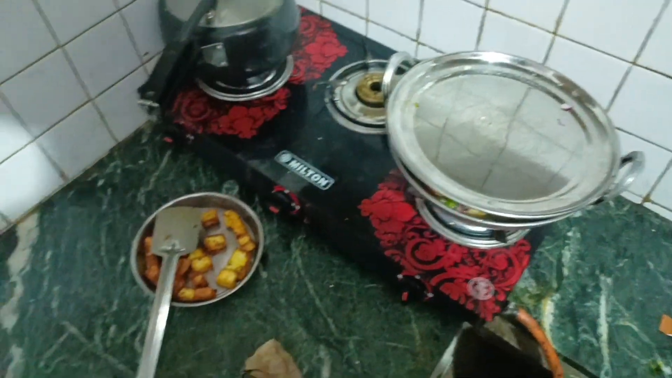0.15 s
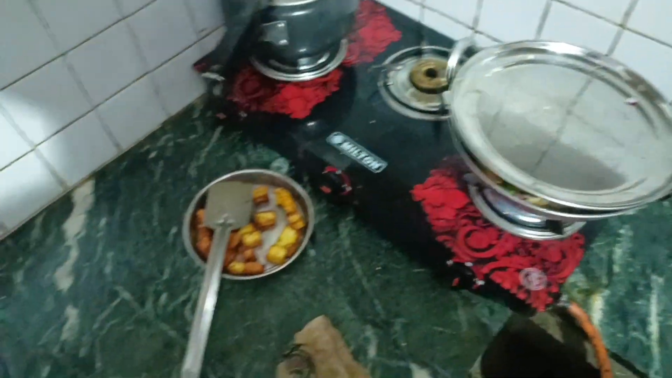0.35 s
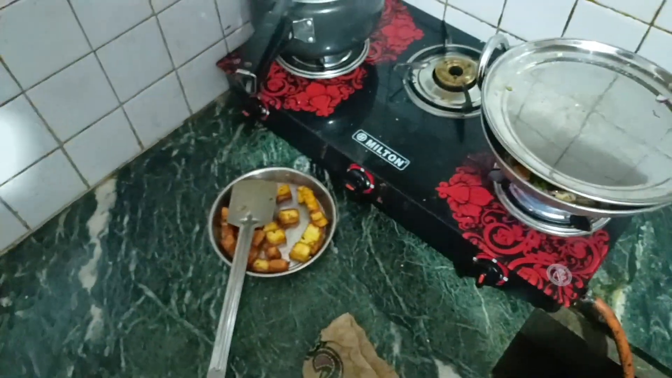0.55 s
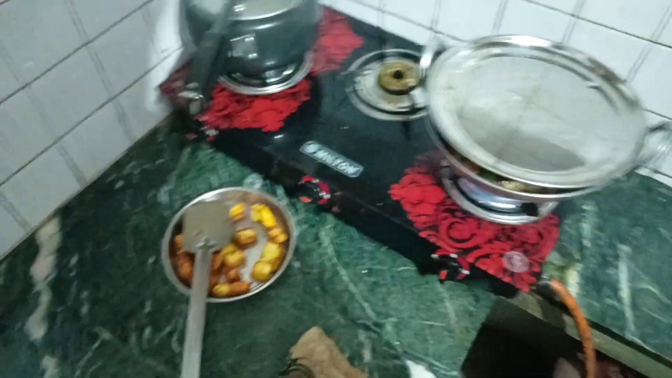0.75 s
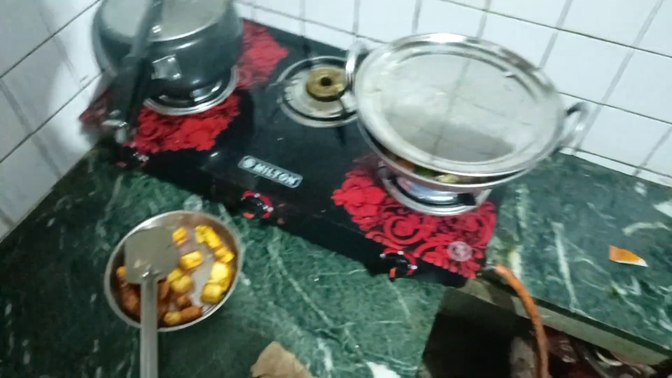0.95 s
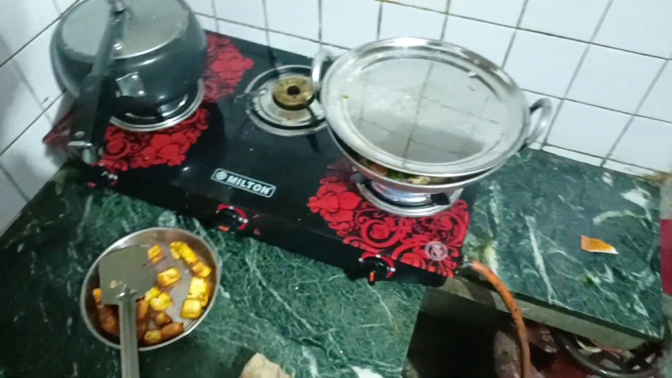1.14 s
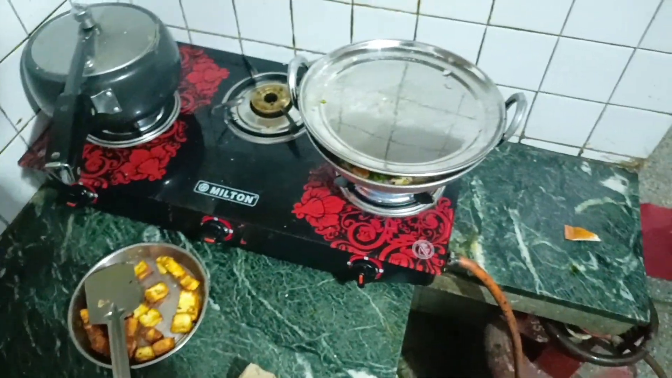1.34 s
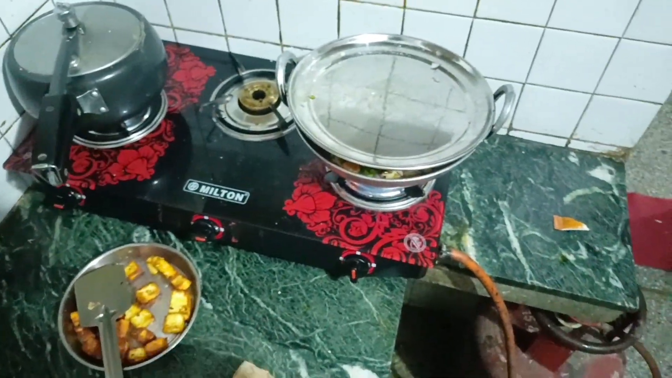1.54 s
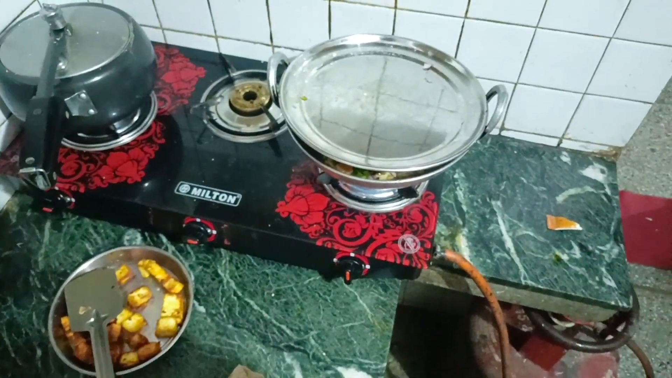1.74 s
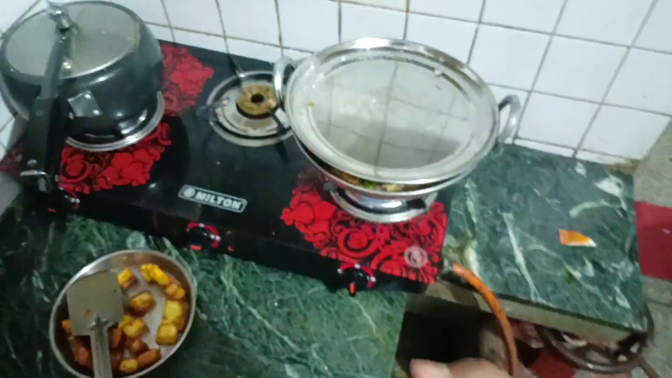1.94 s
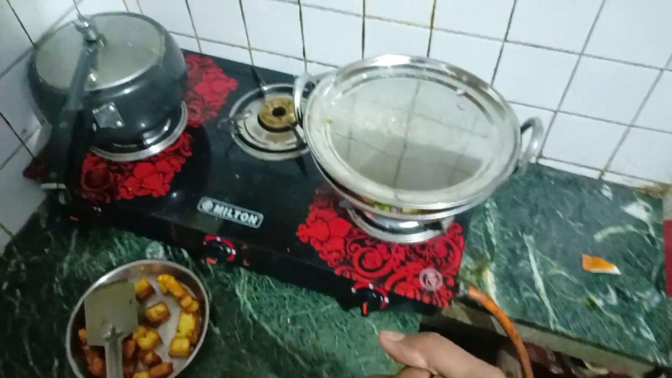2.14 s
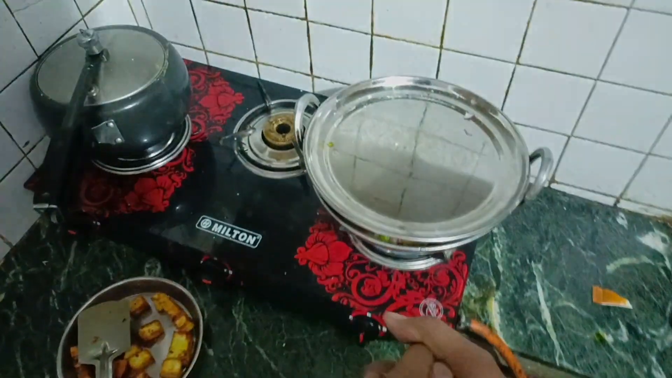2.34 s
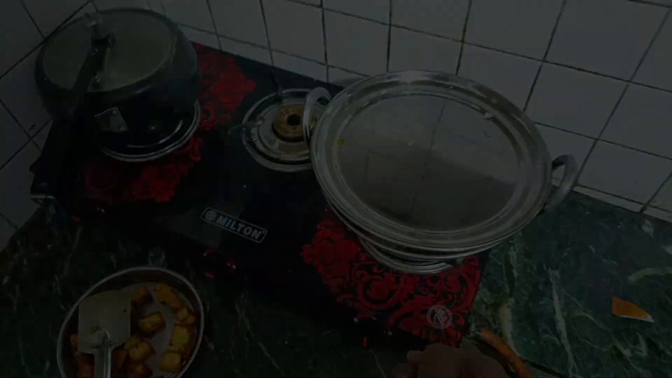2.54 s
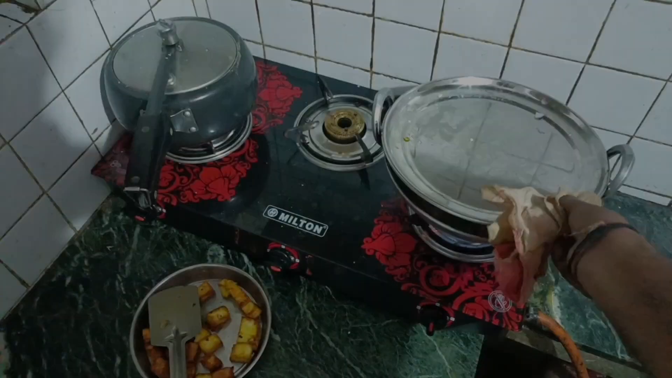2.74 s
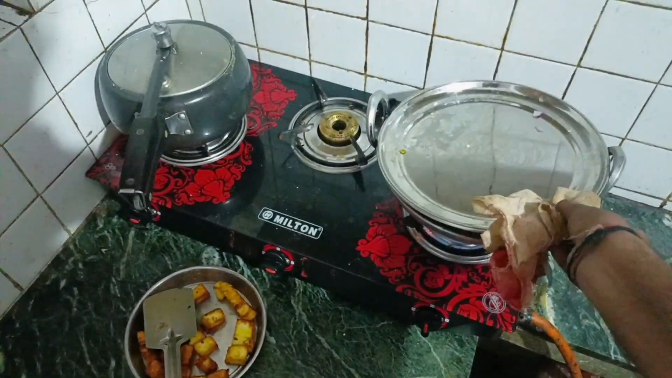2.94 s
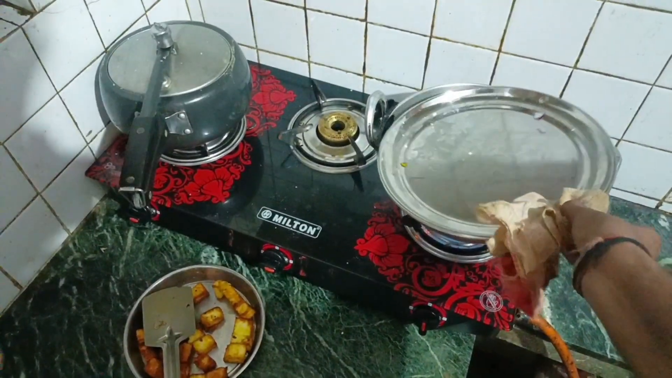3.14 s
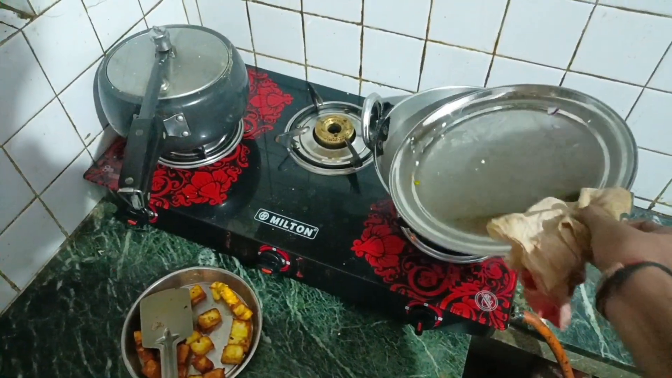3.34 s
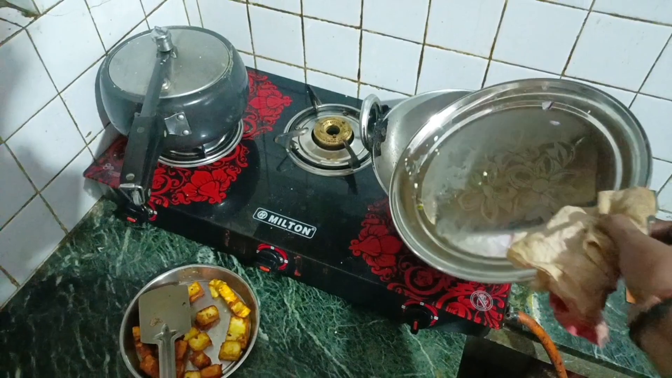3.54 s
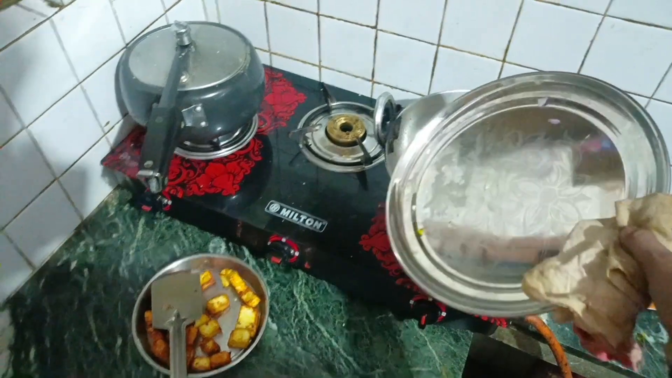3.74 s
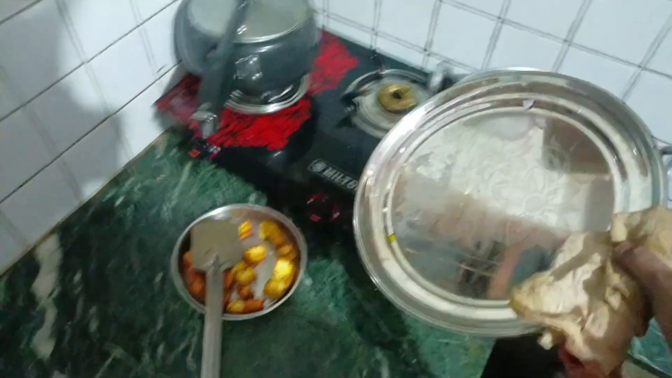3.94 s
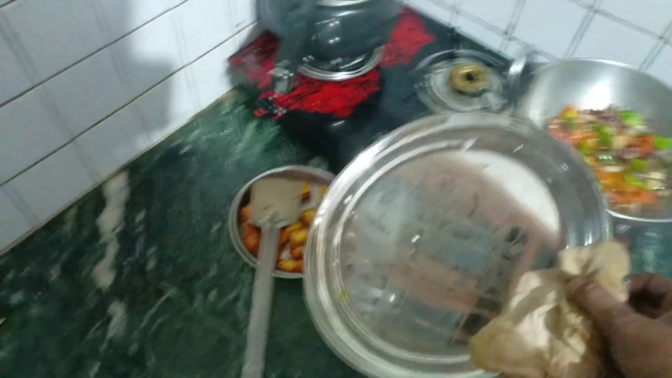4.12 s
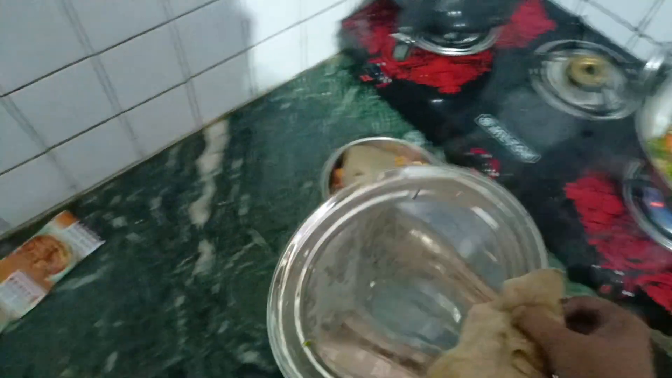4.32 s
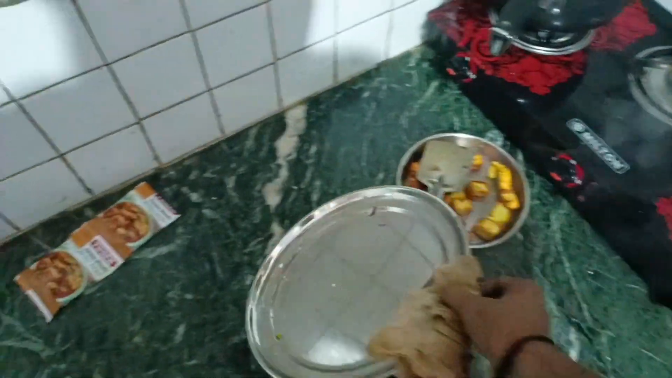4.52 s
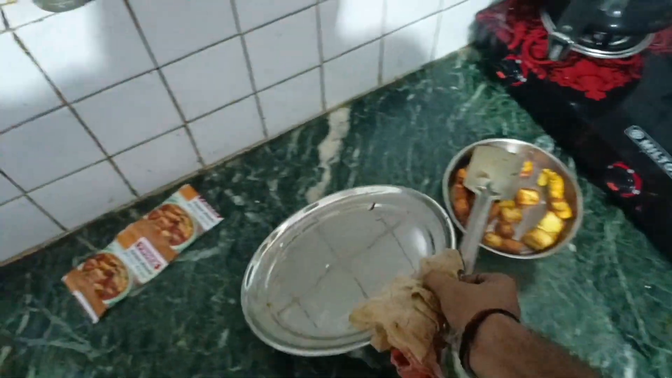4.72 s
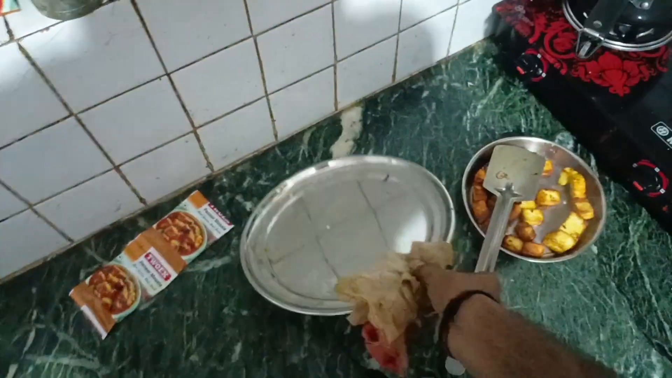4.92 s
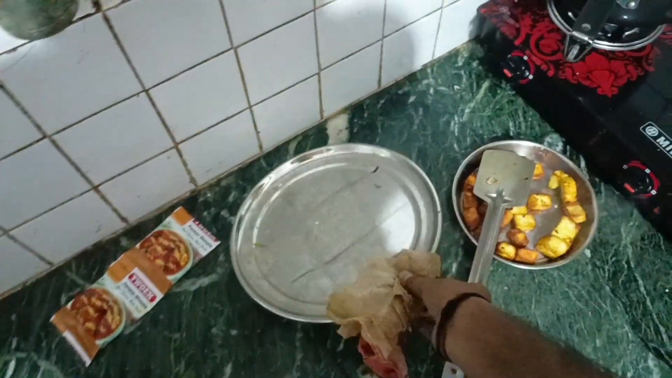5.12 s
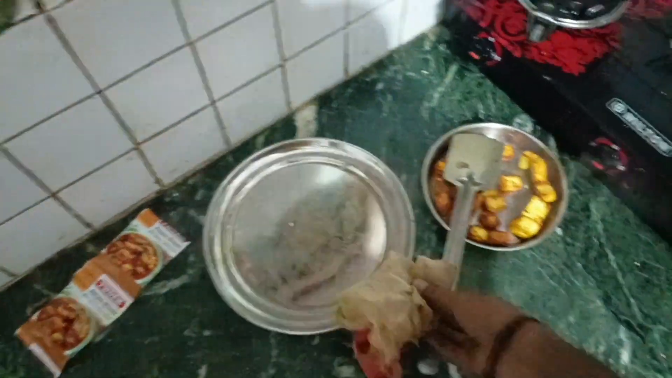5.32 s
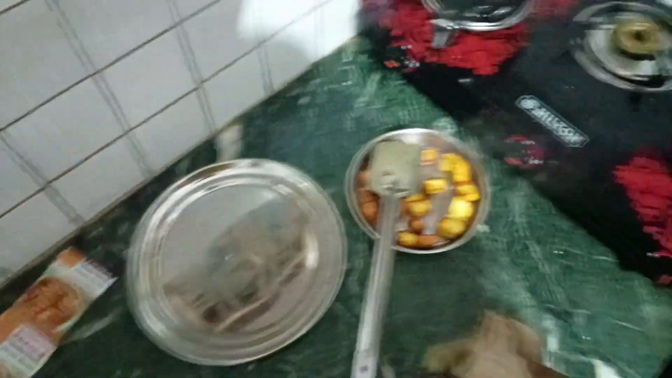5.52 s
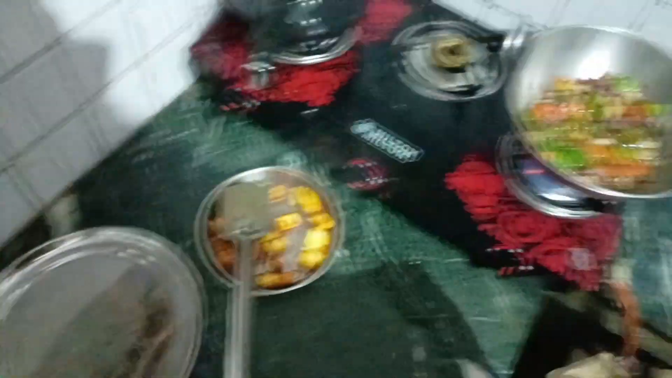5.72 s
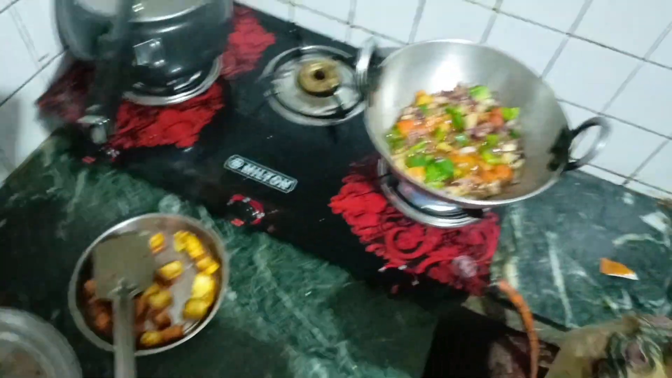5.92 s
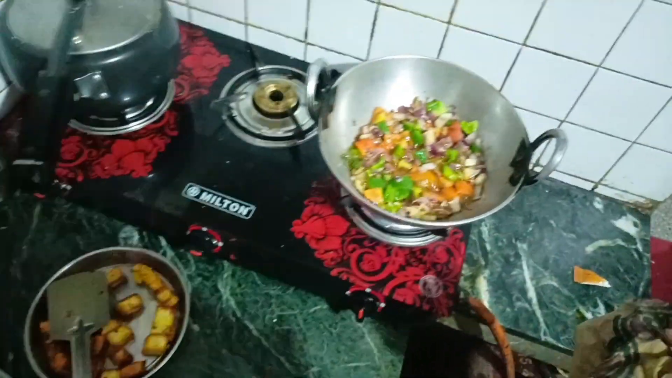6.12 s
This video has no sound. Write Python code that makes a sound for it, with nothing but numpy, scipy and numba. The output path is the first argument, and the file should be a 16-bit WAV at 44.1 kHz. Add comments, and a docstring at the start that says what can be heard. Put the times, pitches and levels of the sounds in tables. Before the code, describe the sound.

Vegetables sizzle steadily in a covered pan, then a steel lid clanks, scrapes off and clatters down on a stone counter.

```python
"""Vegetables fry in a steel pan on a gas stove in a tiled kitchen. At first the pan is covered, and
resonances of the trapped air colour the noise of bursting bubbles. All fades through silence at 2.6 s.
As the sound returns, a hand knocks the lid and drags it off the rim, exciting its damped modes, and the
sizzle opens out. Air buffets the swinging microphone near 4.1 s. The lid's edge meets the stone counter
at 4.7 s, and at 5.3 s the lid drops flat while the frying goes on."""
import sys
import numpy as np
from scipy import signal
from scipy.fft import rfft, irfft, next_fast_len
from scipy.io import wavfile
from scipy.ndimage import uniform_filter1d
from numba import njit

SR = 44100
rng = np.random.default_rng(int(sys.argv[2]) if len(sys.argv) > 2 else 0)


def transcribe(u):
    """Save the signal u as a 16-bit wav file named by the first command-line argument.

    u: samples, shape (n,) or (channels, n), limited to [-1, 1]; the rate is SR.
    q: integer samples, one column per channel.
    """
    v = np.clip(np.atleast_2d(u).T, -1, 1)
    q = np.round(v * 32767).astype(np.int16)
    wavfile.write(sys.argv[1], SR, q)


N = 276330
TIME = np.arange(N) / SR
FFT_SIZE = next_fast_len(N + SR // 2)
HZ = np.maximum(np.fft.rfftfreq(FFT_SIZE, 1 / SR), 1)

# Tiled room. Each row: frequency in Hz, reverberation time in seconds.
REVERB_TIMES = [(100, 0.78), (500, 0.72), (2000, 0.54), (5000, 0.37), (12000, 0.046)]
# Likeness of left and right. Each row: frequency in Hz, correlation.
COHERENCE = [(60, 0.78), (130, 0.75), (290, 0.83), (640, 0.62), (1410, 0.17), (3100, 0.13), (6820, -0.02),
             (15000, 0.0)]

# Noise spectra. Each row: frequency in Hz, relative spectral density in dB.
HUM_SPECTRUM = [(15, -50), (25, -26), (49, -15.5), (92, 1.5), (108, 4), (146, -11), (172, -8.5), (183, -22),
                (220, -5), (290, -21), (480, -120)]
FIZZ_SPECTRUM = [(1800, -28), (3000, -1.5), (4000, -6.5), (4600, -2.5), (6500, -6.5), (7800, -5),
                 (11300, -15.5), (13400, -13), (15000, -17), (15800, -7.5)]
OPEN_PAN_SPECTRUM = [(100, -43), (170, -19.5), (328, 0), (380, -9), (455, 0.5), (528, -6), (670, -9.5),
                     (733, 0.5), (988, -8.5), (2110, -4), (3510, -3), (4200, -11), (6000, -32), (7800, -96),
                     (13200, -120)]
# Countless weak lid modes merge into a clatter. Each row: frequency in Hz, relative density in dB.
ON_PAN_CLATTER = [(120, -36), (200, -13), (829, -5), (1020, -14), (1670, -16), (2570, -2), (4290, -23),
                  (12000, -35.5), (15600, -70), (22000, -120)]
HELD_CLATTER = [(180, -59), (300, -27), (427, -16.5), (738, -21), (881, -9), (1940, -14.5), (2590, -0.5),
                (2900, -10), (14000, -39.5)]
FLAT_CLATTER = [(59, -48), (120, -25), (300, -10), (497, -13.5), (962, -10), (1490, -13), (2060, -6.5),
                (2420, 2.5), (3830, -17.5), (12000, -62), (15600, -81), (22000, -120)]

# Envelopes. Each row: time in seconds, level in dB.
HUM_ENVELOPE = [(0, -60), (1.2, -56), (2.2, -55.5), (3.6, -61), (4.08, -52), (4.2, -45.5), (4.5, -53.5),
                (5.2, -55.5), (6.27, -53.5)]
GUST_ENVELOPE = [(4.05, -79), (4.13, -45), (4.3, -52), (4.4, -47), (4.6, -57), (4.8, -82)]
SCRAPE_ENVELOPE = [(3.06, -72), (3.12, -43), (3.18, -33.5), (3.24, -37.5), (3.32, -43.5), (3.45, -53)]
# The fizz jumps as the lid cracks open; fizz and sizzle swell as the microphone turns back to the pan.
# Each row: time in seconds, sizzle level in dB, fizz level in dB.
FRYING_ENVELOPE = [(0, -44.5, -48.5), (1.3, -44.5, -49), (1.83, -43.5, -43), (2.12, -42, -45.5),
                   (2.33, -44, -46), (2.5, -41, -42.5), (2.7, -46.5, -52), (2.86, -40.5, -52),
                   (2.91, -43, -37.5), (3.07, -46, -48.5), (3.3, -48.5, -47), (3.7, -42, -45.5),
                   (4.0, -44.5, -48.5), (4.15, -44, -42), (4.35, -44, -46), (4.9, -44.5, -43.5),
                   (5.35, -41.5, -45), (5.8, -38, -43.5), (6.27, -39, -42)]
# The lid slides off. Each row: time in seconds, share of the pan uncovered.
PAN_OPENING = [(2.9, 0.14), (3.5, 0.96)]
# Air under the lid and around the pan. Each row: frequency in Hz, width in Hz, relative level in dB.
CAVITY_MODES = [(216, 41, -7.5), (340, 57, -3.5), (464, 30, 0.5), (595.3, 45.5, 5.5), (700, 41, -3.5),
                (1174, 75, -9), (1285, 56, -1), (1923, 123, -3.5), (2140, 42, -3.5), (2603, 170, -7),
                (3030, 280, -6.5), (3620, 250, -16), (4360, 250, -19.5)]
# The loudest spits of fat. Each row: start in seconds, nominal peak in dB, left minus right in dB.
LOUD_SPITS = [(0.5994, -36, 7), (1.047, -34, 3), (1.0994, -39, 6), (1.5459, -33.5, 8), (1.631, -29.5, 8),
              (2.042, -29, 5), (2.117, -29.5, 3.5), (2.1779, -34, 10), (2.247, -28.5, 1.5), (2.432, -26, 2),
              (3.235, -27, 0.5), (4.161, -27, 1), (4.29, -28, 0), (4.459, -27.5, -2), (4.587, -36, -10),
              (5.045, -26, -3), (5.207, -24.5, -3), (5.464, -30, -0.5), (5.618, -29, 0), (5.7563, -28.5, 5),
              (5.989, -35, 8), (6.063, -29, -0.5), (6.24, -29.5, 8)]
# Big bubbles. Each row: time in seconds, peak in dB, frequency in Hz.
BIG_BUBBLES = [(1.6764, -29, 1180), (1.684, -30, 1160)]

# The lid resting on the pan, held by its rim, and lying on stone.
# Each row: frequency in Hz, relative level in dB, 60 dB decay time in seconds at damping factor 1.
ON_PAN_MODES = [(218.4, -11.5, 0.59), (352, -12, 0.99), (436, -3.5, 0.51), (481.5, -2, 0.51),
                (586, -12, 0.29), (727, -3, 0.28), (810, -2.5, 0.17), (900, -8, 0.85), (1027, 2, 0.25),
                (1160, -3.5, 0.24), (1287, -8, 0.35), (1432, -5, 0.41), (1554, -5.5, 0.49),
                (1837, 3, 0.089), (2116, 5, 0.22), (2220, 0, 0.48), (2400, -9, 0.29), (2550, 0.5, 0.52),
                (2630, -7, 0.45), (2850, -7, 0.28), (2980, -19, .25), (3254, -1, .25), (3280, -10, 0.28),
                (3550, -4.5, 0.31)]
HELD_MODES = [(436, -10, .5), (511, -6, .25), (590, -16, .25), (904, -10, .6), (1023, -14, .7),
              (1174, -10, .6), (1270, -21, .6), (1470, -14, .7), (1555, -8, .25), (1766, -14, .55),
              (1868, -10, .32), (2051, -10, .43), (2148, -12, .6), (2266, -9, .8), (2337, -10, .6),
              (2541, -5, .3), (2582, -2, .5), (2611, 0, .67), (2665, -9, .45), (3068, -6, .45),
              (3171, -6, .45), (3623, -19, .5), (4334, -27, .5), (4619, -23, .4), (4791, -20, .3),
              (5426, -20, .25)]
FLAT_MODES = [(333, -8, .3), (351, -13, .45), (490, -15, .8), (748, -21, .9), (1120, -13, .26),
              (1174, -7, .21), (1250, -5, .1), (1324, 0, .15), (1400, -13, .35), (1437, -7, .22),
              (1523, -5, .31), (1615, -7, .17), (1737, -12, .5), (1853, -7, .4), (1887, -10, .4),
              (2205, -10, .55), (2387, -5, .45), (2474, -7, .5), (2498, -8, .55), (2579, -11, .65),
              (2618, -12, .5), (2735, -11, .5), (2799, -14, .4), (3025, -18, .5), (3128, -18, .5),
              (3321, -10, .28), (3575, -22, .4), (5378, -10, .07), (6080, -15, .1)]
# Blows on the lid. Each row: start in seconds, ring level in dB, centre frequency in Hz, fall to either
# side of it in dB per octave, crack level in dB, clatter level in dB, damping factor.
LID_IMPACTS = [(2.742, -17.5, 700, 6.5, -29, -18, 1.95), (2.881, -24.5, 1110, 0, -33, -30.5, 3),
               (3.079, -35, 700, 22, -41, -38.5, 3.6), (3.109, -32, 900, 10, -46, -55, 1.36),
               (3.15, -35, 207, 12.5, -52, -53, 2.2), (3.168, -29, 2500, 12, -39, -30, 1.7),
               (3.205, -35, 507, -8, -41, -51, 5.9), (3.479, -55, 3400, 12, -35, -68, 2.9),
               (4.724, -12.5, 2540, 0, -42, -19, 1.03), (4.729, -9.5, 2770, 3.5, -30, -24, 8.6),
               (4.82, -25.5, 2500, -2, -43, -27.5, 1.43), (4.915, -32, 2500, -2, -50, -32.5, 0.74),
               (5.043, -30, 561, 8, -40, -46, 3.2), (5.123, -28.5, 2360, 12, -50, -38.5, 4.4),
               (5.168, -40, 2550, 14, -45, -54, 4), (5.198, -40, 3100, 13, -47, -55, 1.5),
               (5.204, -32, 600, 17.5, -32, -49, 1.8), (5.291, -40, 2500, 8, -39, -51, 6.5),
               (5.322, -13.5, 2000, -0.8, -24.5, -21.5, 1.03), (5.325, -15.5, 340, 23, -40, -8, 5.6),
               (5.335, -13, 1700, 3.5, -38, -38, 2)]

LIFTED_S, DROPPED_S = 4., 5.3  # the lid leaves the pan, and is let go
SILENT_S, FADE_OUT_S, FADE_IN_S = 2.629, 0.49, .48
WAVER_DB = 1.4  # spread of level in each band of hum and sizzle
LN_1000 = np.log(1000)  # exponent of a 60 dB decay


def undb(db):
    """Amplitude grows tenfold for every 20 dB."""
    return 10 ** (np.asarray(db) / 20)


def unit(x):
    """Normalisation to an rms of 1."""
    return x / np.sqrt(np.mean(x ** 2))


def over_hz(table, hz=HZ):
    """Interpolation on a logarithmic frequency axis."""
    freqs, values = np.transpose(table)
    return np.interp(np.log(hz), np.log(freqs), values)


def over_time(table, column=1):
    """Linear interpolation of one column at every sample."""
    columns = np.transpose(table)
    return np.interp(TIME, columns[0], columns[column])


def waveform(spectrum):
    """The inverse Fourier transform, cut to the scene's length."""
    return irfft(spectrum, FFT_SIZE)[..., :N]


def colour(x, gain):
    """Filtering is multiplication of the spectrum."""
    return waveform(rfft(x, FFT_SIZE) * gain)


def coloured_noise(spectrum):
    """Spectral shaping of stereo white noise by points of frequency in Hz and level in dB."""
    return unit(colour(rng.standard_normal((2, N)), undb(over_hz(spectrum))))


def drift(rate_hz):
    """Two moving averages smooth random steps into a slow fluctuation of spread near 1."""
    hold = int(SR / rate_hz)
    steps = np.repeat(rng.standard_normal(N // hold + 1), hold)
    return 1.44 * uniform_filter1d(uniform_filter1d(steps, hold), hold)[:N]


def balance(db):
    """A level difference, left minus right, gives direction."""
    return undb(np.array([[db / 2], [-db / 2]]))


def partly_coherent(mid, side, hz=HZ):
    """Mid and side spectra mix to be alike in the bass and unrelated in the treble."""
    alike = np.clip(over_hz(COHERENCE, hz), 0, .98)
    return mid * np.sqrt(1 + alike) + side * np.sqrt(1 - alike) * np.array([[1], [-1]])


def shot_noise(per_s, spread_db, hiss):
    """Shot noise: the stereo spectrum of random, exponentially dying bursts over steady hiss."""
    impulses = (rng.random(N) < per_s / SR) * undb(spread_db * rng.exponential(size=N))
    pops = signal.lfilter([1], [1, -np.exp(-1 / (0.0018 * SR))], impulses)
    mid, side = rfft(rng.standard_normal((2, N)) * (hiss + unit(pops)), FFT_SIZE)
    return partly_coherent(mid, side)


def flicker(spectrum, edges_hz, spread_db, rate_hz):
    """Independent amplitude modulation makes each band waver."""
    out = 0
    for low, high in zip(edges_hz, edges_hz[1:]):
        band = waveform(spectrum * ((HZ >= low) & (HZ < high)))
        out = out + undb(spread_db * drift(rate_hz)) * band
    return unit(out)


def room(x):
    """Reverberation: reflections from tiles merge into a noise tail that dies faster in the treble."""
    t, tail = np.arange(SR) / SR, 0
    hz = np.maximum(np.fft.rfftfreq(SR, 1 / SR), 1)
    mid, side = rfft(rng.standard_normal((2, SR)))
    noise = partly_coherent(mid, side, hz)
    build_up = 1 - np.exp(-t / 0.0081)
    for centre in 125 * 2. ** np.arange(8):
        octave = irfft(noise * (abs(np.log2(hz / centre)) < .5), SR)
        tail = tail + octave * np.exp(-LN_1000 * t / over_hz(REVERB_TIMES, centre)) * build_up
    return colour(x.mean(axis=0), rfft(tail / np.sqrt(np.sum(tail ** 2) / 2), FFT_SIZE))


def hum():
    """Burner and house give low noise that throbs by slow amplitude modulation."""
    spectrum = shot_noise(per_s=43, spread_db=1.3, hiss=14.0) * undb(over_hz(HUM_SPECTRUM))
    rumble = flicker(spectrum, [0, 80, SR], WAVER_DB, rate_hz=6.8)
    throb_db = 2 * drift(rate_hz=9)
    return undb(over_time(HUM_ENVELOPE) + throb_db) * rumble


def gust():
    """Turbulence: air passing the swinging microphone makes a brief rumble."""
    rumble = coloured_noise([(20, -23), (60, -6.5), (130, -16.5), (400, -38)])
    return undb(over_time(GUST_ENVELOPE)) * rumble


def fizz():
    """Many fine bursts add up to high-frequency shot noise."""
    spectrum = shot_noise(per_s=900, spread_db=3.2, hiss=2.1) * undb(over_hz(FIZZ_SPECTRUM))
    return flicker(spectrum, [0, 9500, 13000, SR], spread_db=.9, rate_hz=25)


def sizzle():
    """Cavity resonance colours the bursting bubbles, and yields to the open pan as the lid slides off."""
    bubbles = shot_noise(per_s=400, spread_db=0.96, hiss=3.3)
    cavity_power = sum(undb(2 * db) / (1 + ((HZ - hz) / (width / 2)) ** 2) ** 1.61
                       for hz, width, db in CAVITY_MODES)
    floor = undb(-34.5) * (HZ > 170) * (HZ < 5000)
    covered = unit(waveform(bubbles * (np.sqrt(cavity_power) + floor)))
    uncovered = unit(waveform(bubbles * undb(over_hz(OPEN_PAN_SPECTRUM))))
    opening = over_time(PAN_OPENING)
    blend = np.sqrt(1 - opening) * covered + np.sqrt(opening) * uncovered
    return flicker(rfft(blend, FFT_SIZE), [0, 400, 800, 1600, 2400, 3400, SR], WAVER_DB, rate_hz=18)


def frying():
    """Common modulation: bubbles come in swarms, so fizz and sizzle surge together."""
    sizzle_db, fizz_db = over_time(FRYING_ENVELOPE, 1), over_time(FRYING_ENVELOPE, 2)
    surge_db = 1.1 * drift(rate_hz=30)
    return undb(fizz_db + surge_db) * fizz() + undb(sizzle_db + 0.88 * surge_db) * sizzle()


def spits(weak_count=14, weak_db=-42, crest_db=10, length_s=0.058):
    """Each spit of fat is a swarm of tiny bursts: bright noise under an exponential decay."""
    envelope, size = np.zeros((2, N + SR)), SR // 4
    decay = np.exp(-3 * np.arange(size) / SR / length_s)
    weak = [(s, weak_db, rng.standard_normal()) for s in rng.random(weak_count) * N / SR]
    for start, db, balance_db in LOUD_SPITS + weak:
        i = int(start * SR)
        envelope[:, i:i + size] += undb(db - crest_db) * balance(balance_db) * decay
    crackle = coloured_noise([(1500, -13), (3000, 16.5), (8000, 9.5), (12000, 0.0), (16000, 3.5)])
    return envelope[:, :N] * crackle


def plops():
    """A big bubble emits a wave packet: a few cycles under a Gaussian envelope."""
    return sum(undb(db) * np.exp(-((TIME - s) / 0.00087) ** 2) * np.cos(2 * np.pi * hz * (TIME - s))
               for s, db, hz in BIG_BUBBLES)


@njit
def resonate(force, poles, gains, leads, wander):
    """Superposition of damped modes; each leads in phase on one side and lags on the other."""
    out = np.zeros((2, len(force)))
    for m in range(len(poles)):
        z = 0j
        for i in range(len(force)):
            z = z * poles[m] + force[i] * gains[m]
            if i % 32 == 0:
                z *= wander[m, i // 32]
            out[0, i] += z.imag + leads[m] * z.real
            out[1, i] += z.imag - leads[m] * z.real
    return out


def lid_ring(modes, force, damping, blur=.0025):
    """Forced vibration: loose contact jogs each mode's phase, broadening it by a share of its pitch."""
    hz, db, t60 = np.transpose(modes)
    poles = np.exp(2j * np.pi * hz / SR - LN_1000 * damping / (t60 * SR))
    step_rad = np.sqrt(2 * np.pi * blur * hz * 32 / SR)
    wander = np.exp(1j * step_rad[:, None] * rng.standard_normal((len(hz), len(force) // 32 + 1)))
    gains = undb(db) * np.exp(2j * np.pi * rng.random(len(hz)))
    leads = np.minimum(hz / 1100, 1) * rng.standard_normal(len(hz))  # higher modes spread wider
    return resonate(force, poles, gains, leads, wander)


def lid_scrape(slips_per_s=500):
    """Stick-slip friction: rim drags on rim in uneven slips that keep the lid ringing."""
    i, size = int(SCRAPE_ENVELOPE[0][0] * SR), SR // 2
    slips = (rng.random(size) < slips_per_s / SR) * rng.standard_normal(size)
    out = np.zeros((2, N))
    out[:, i:i + size] = unit(lid_ring(ON_PAN_MODES, slips, damping=3.7))
    return out * undb(over_time(SCRAPE_ENVELOPE))


def lid_blows(from_s, until_s, modes, clatter_spectrum, balance_db):
    """Impulse response: each blow gives a crack, a ring and a clatter, until hand or stone chokes them."""
    out, size = np.zeros((2, N)), int(.45 * SR)
    t = np.arange(size) / SR
    impulse = (t == 0) * 1.
    clatter_t60, choke_t60 = 0.45, 0.83  # seconds; damping shortens the first
    crack_band = signal.butter(2, [400, 7000], "band", fs=SR, output="sos")
    noise = shot_noise(per_s=2000, spread_db=0.98, hiss=9.6)
    metal = unit(waveform(noise * undb(over_hz(clatter_spectrum))))
    for start, ring_db, centre_hz, fall_db, crack_db, clatter_db, damping in LID_IMPACTS:
        if not from_s <= start < until_s:
            continue
        i = int(start * SR)
        struck = [(hz, db - fall_db * abs(np.log2(hz / centre_hz)), t60) for hz, db, t60 in modes]
        strength = np.sqrt(sum(undb(2 * db) for _, db, _ in struck))
        ring = undb(ring_db) * lid_ring(struck, impulse, damping) / strength
        bright = unit(signal.sosfilt(crack_band, rng.standard_normal((2, size))))
        crack = undb(crack_db) * bright * np.exp(-t / .004)
        clatter = undb(clatter_db) * metal[:, i:i + size] * np.exp(-LN_1000 * t * damping / clatter_t60)
        free_s = 0.2 / damping
        choke = np.exp(-LN_1000 * np.maximum(t - free_s, 0) / choke_t60)
        out[:, i:i + size] += balance(balance_db) * choke * (ring + crack + clatter)
    return out


def scene():
    """Superposition of stove, lid and the lid's reverberation, under a linear fade to silence and back."""
    lid = lid_blows(0, LIFTED_S, ON_PAN_MODES, ON_PAN_CLATTER, balance_db=0.2) + lid_scrape()
    lid += lid_blows(LIFTED_S, DROPPED_S, HELD_MODES, HELD_CLATTER, balance_db=-1.5)
    lid += lid_blows(DROPPED_S, np.inf, FLAT_MODES, FLAT_CLATTER, balance_db=2.0)
    fade = np.interp(TIME, [SILENT_S - FADE_OUT_S, SILENT_S, SILENT_S + FADE_IN_S], [1, 0, 1])
    return fade * (hum() + gust() + frying() + spits() + plops() + lid + undb(-9) * room(lid))


def record(dry):
    """Band limiting and saturation: the microphone drops the deepest bass, clips and cuts the top."""
    high_pass = signal.butter(2, 40, "high", fs=SR, output="sos")
    low_pass = signal.ellip(10, .2, 70, 15850, fs=SR, output="sos")
    clipped = np.clip(signal.sosfilt(high_pass, dry), -.92, .92)
    return signal.sosfilt(low_pass, clipped)


dry = scene()
out = record(dry)
transcribe(out)
```